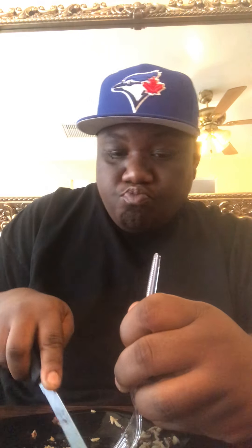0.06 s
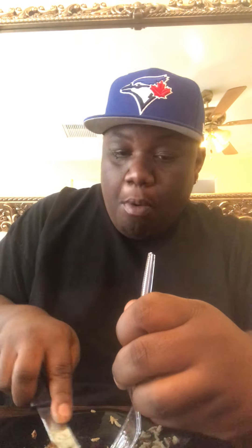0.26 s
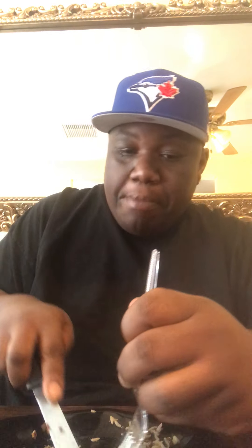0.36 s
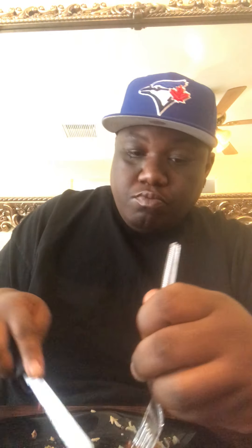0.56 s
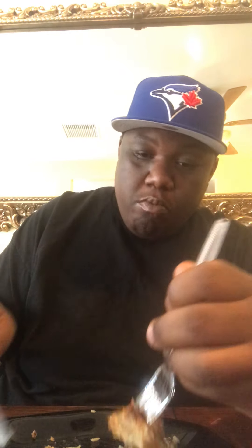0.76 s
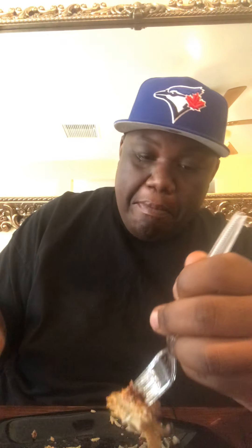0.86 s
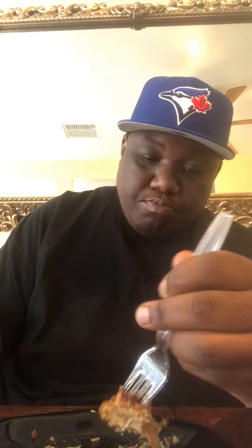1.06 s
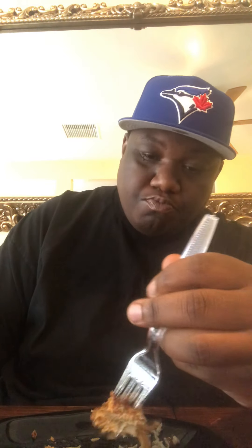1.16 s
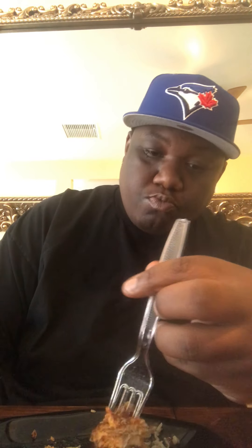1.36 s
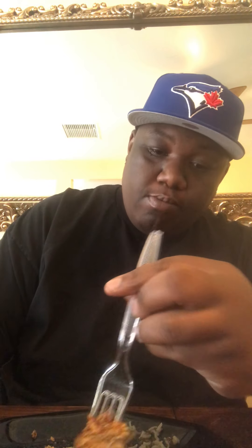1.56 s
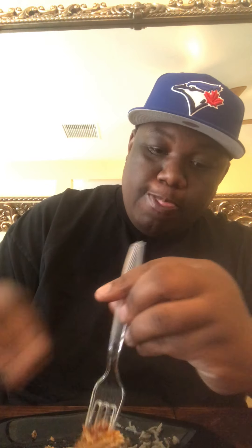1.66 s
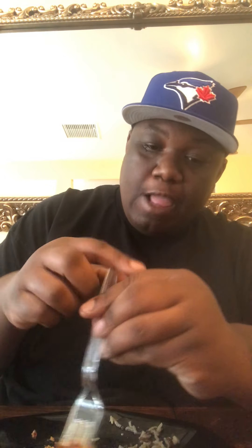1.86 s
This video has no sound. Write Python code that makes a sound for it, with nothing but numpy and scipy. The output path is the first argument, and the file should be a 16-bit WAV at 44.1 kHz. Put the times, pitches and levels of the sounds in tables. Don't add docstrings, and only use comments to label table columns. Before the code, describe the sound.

A table knife saws through food, clacks loudly on a plate, then is set down on wood

```python
import sys
import numpy as np
from scipy import signal
from scipy.fft import rfft, irfft
from scipy.io import wavfile
from scipy.ndimage import uniform_filter1d

SR = 44100
rng = np.random.default_rng(int(sys.argv[2]) if len(sys.argv) > 2 else 0)


def materialize(psi):
    bounded = np.clip(np.atleast_2d(psi).T, -1, 1)
    quanta = np.round(bounded * 32767).astype(np.int16)
    wavfile.write(sys.argv[1], SR, quanta)


def ratio(d):
    e = np.asarray(d, float) / 20
    return 10 ** e


N = 83790
T = np.arange(N) / SR


def unit(x):
    return x / np.sqrt(np.mean(x ** 2))


def band(x, hz, width):
    return signal.lfilter(*signal.iirpeak(min(hz, 0.45 * SR), hz / width, fs=SR), x)


def bell(centre_s, length_s):
    return np.exp(-((T - centre_s) / length_s) ** 2)


def body(x, peaks):
    total = 0
    for k, (hz, width, db) in enumerate(peaks):
        mode = band(band(x, hz, 2 * width), hz, width)
        total = total + (-1) ** k * ratio(db) * np.sqrt(100 / width) * mode
    return unit(total)


def slips():
    slips_per_s, scatter_db = 4000, 2
    chance, sign, size = rng.random((3, N))
    happens = chance < slips_per_s / SR
    return unit(happens * np.sign(sign - 0.5) * ratio(-scatter_db * np.log(size + 0.0059)))


def chatter():
    # t/s, length/s, level/dB
    catches = [
        (.026, .003, 4.5),
        (.056, .003, 3.5),
        (.091, .003, 3),
        (.105, .004, 6.5),
        (.128, .005, 5),
        (.157, .003, 3.5),
        (.209, .003, 5),
        (.2275, .002, 3),
        (.232, .0015, 3.5),
    ]
    rate_per_s, depth_db = 150, 1.5
    hold = int(SR / rate_per_s)
    steps = np.repeat(rng.standard_normal(N // 40), hold)[:N]
    walk = uniform_filter1d(steps, hold)
    grabs = sum(db * bell(s, d) for s, d, db in catches)
    return ratio(depth_db * walk + grabs)


def knife():
    # t/s, rasp level/dB, scrape level/dB
    strokes = np.array([(0, -52, -61), (0.046, -64.5, -61), (0.056, -46.5, -54.5), (0.092, -38.5, -53),
                        (0.157, -43, -59.5), (0.164, -53.5, -69), (0.204, -57, -71.5), (.208, -54.5, -55),
                        (0.216, -54, -51), (0.234, -36, -28), (0.238, -33.5, -32), (.3, -54, -43),
                        (0.419, -82.5, -55.5), (.5, -120, -56), (0.558, -84, -64), (.72, -90, -88)])
    # f/Hz, width/Hz, level/dB
    food = [(475.6, 110, -2), (650, 82, -3.5), (781, 190, -0.5), (1051, 480, -6), (1446, 110, -2.5),
            (1775, 120, -9), (2450, 60, -17.5)]
    # f/Hz, width/Hz, level/dB
    sawing = [(1790, 600, 3.5), (2443, 200, 0), (2780, 320, -4), (3175, 120, 0), (3760, 100, -1),
              (4400, 310, 4), (5170, 500, -6), (6700, 1200, -5), (7680, 690, -7.5), (8900, 960, -9.5),
              (10900, 900, -16), (13800, 1900, -13.5)]
    # f/Hz, width/Hz, level/dB
    dragging = [(1410, 600, 3.5), (1950, 460, -2), (2600, 160, 1), (3000, 300, -12), (3765, 200, -2.5),
                (4445, 250, 1), (5735, 940, 0.5), (7646, 710, -1.5), (8900, 750, -4), (10000, 200, -15.5),
                (11230, 150, -10), (12110, 200, -18), (13370, 180, -11), (14700, 500, -17.5)]
    slip_s = 0.236
    dull = body(slips(), food)
    bright = np.where(T < slip_s, body(slips(), sawing), body(slips(), dragging))
    dull_gain = ratio(np.interp(T, strokes[:, 0], strokes[:, 1]))
    bright_gain = ratio(np.interp(T, strokes[:, 0], strokes[:, 2]))
    return chatter() * (dull * dull_gain + bright * bright_gain)


def hits(rows, modes, spread, rise_s, crack_hz, crack_t60, cycles=0.6):
    side_db = -7.5
    out, t = np.zeros(N + SR), T[:SR // 2]
    f, db, t60 = np.repeat(modes, 3, axis=0).T[:, :, None]
    side = np.tile([0, -1, 1], len(modes))[:, None]
    crack_band = signal.butter(3, [600, crack_hz], "band", fs=SR, output="sos")
    for s, ring_db, contact_ms, crack_db in rows:
        level, detune, turn = rng.standard_normal((3,) + f.shape)
        hz = f * (1 + spread * side * (1 + 0.43 * detune))
        phase = np.repeat(turn[::3], 3, axis=0)
        decay = ratio(db + side_db * side ** 2 + 2.3 * level - 60 * t / t60)
        build = 1 - np.exp(-f * t / cycles)
        ring = (decay * np.sin(2 * np.pi * (hz * t + phase)) * build).sum(0)
        u = (T[:300] + 1 / SR) * 4000 / max(contact_ms, 0.01)
        push = u * np.exp(-u)
        pushed = signal.fftconvolve(ring, push / push.sum())[:len(t)]
        crack = signal.sosfilt(crack_band, rng.standard_normal(len(t)))
        both = ratio(ring_db) * pushed + crack * ratio(crack_db - 60 * t / crack_t60)
        i = int(s * SR)
        out[i:i + len(t)] += both * (1 - np.exp(-t / rise_s))
    return out[:N]


def clacks():
    # t/s, ring level/dB, contact/ms, crack level/dB
    strikes = [
        (.2068, -48, 0.17, -58),
        (.2095, -49.5, 0.14, -45.5),
        (.2312, -31.5, 0.44, -35),
        (.2338, -14.5, 0.073, -9),
        (.4953, -49, 0.051, -49),
    ]
    # f/Hz, level/dB, t60/s
    blade = [(516.2, -15.5, 0.058), (1185, -15, 0.044), (1401, -9.5, 0.037), (1836, -11, 0.044),
             (1980, -2.5, 0.016), (3100, -10, 0.046), (3724, -9, .03), (4300, 7.5, 0.012),
             (4630, -2, 0.028), (5490, -3, 0.015), (7560, -6.5, .03), (10140, -15.5, .034),
             (11170, -6.5, 0.053), (13320, -7.5, 0.054)]
    return hits(strikes, blade, 0.0017, 0.00067, 13000, 0.018)


def thuds():
    # t/s, ring level/dB, contact/ms, crack level/dB
    blows = [(1.5358, -28, 0.85, -45.5), (1.5398, -36, 1, -64), (1.558, -49.5, 0.77, -64),
             (1.592, -51, 0.64, -70), (1.6551, -29.5, 0.2, -30), (1.677, -41.5, 0.6, -47),
             (1.696, -35.5, 0.64, -52), (1.700, -39, .8, -56), (1.7295, -35, 0.35, -48.5),
             (1.7589, -49, 0.37, -62), (1.7809, -39.5, 0.46, -55)]
    # f/Hz, level/dB, t60/s
    wood = [(114, -9, 0.095), (195, -3, 0.045), (234, -5, 0.073), (400, -19.5, 0.1), (450.8, 4, 0.067),
            (553.8, -4, 0.11), (678, -17, 0.11), (883, -3.5, 0.093), (965, -16, 0.07), (1088.5, -11, 0.11),
            (1211, -15, 0.1), (1480, -6.5, 0.077), (1890, -14, 0.087), (2356, -16, 0.077)]
    return hits(blows, wood, 0.078, 0.00046, 4970, 0.035, 1.02)


def landing():
    # t/s, ring level/dB, contact/ms, crack level/dB
    landings = [
        (1.6552, -43, 0.044, -45.5),
    ]
    # t/s, ring level/dB, contact/ms, crack level/dB
    rebounds = [
        (1.5355, -57, 0.17, -55),
        (1.695, -51, 0.27, -58),
        (1.7295, -50, 0.21, -54),
        (1.7815, -57.5, 0.3, -53),
    ]
    # f/Hz, level/dB, t60/s
    steel = [(2360, -2, 0.06), (2730, -1, 0.072), (3120, -9, 0.11), (3950, -0.5, 0.053),
             (4440, -4.5, 0.041), (5130, -1, 0.043), (5670, -13, 0.087), (7100, -9, .04),
             (8900, -15, 0.071), (9900, -21, 0.057), (11600, -14, .05), (13300, -17, 0.033),
             (14900, -15, .02)]
    bright = hits(landings, steel, 0.013, 0.00053, 16000, 0.0088)
    return bright + hits(rebounds, steel[:7], 0.016, 0.00034, 5000, 0.012)


def clinks():
    # t/s, ring level/dB, contact/ms, crack level/dB
    taps = [
        (1.2860, -49.5, 0.035, -39.5),
        (1.8895, -70, 0.027, -46),
        (1.8985, -62, 0.045, -48),
    ]
    # f/Hz, level/dB, t60/s
    plate = [(549, -9.5, 0.15), (1070, -7, 0.34), (1870, -12, 0.6), (3110, -15.5, 0.16), (4440, 6, 0.032),
             (5510, 2, 0.062), (7280, -10.5, 0.056), (8242, -26, 0.028), (9060, -10.5, 0.037),
             (11500, -27, 0.025), (13400, -17, .02), (15160, -3, 0.027)]
    return hits(taps, plate, 0.0057, 0.00043, 22000, 0.0146)


def fork():
    # t/s, length/s, ring level/dB, dull scuff level/dB
    brushes = [(1.30, 0.0099, -62, -67), (1.329, 0.013, -75, -84), (1.373, 0.003, -65, -75),
               (1.383, 0.0068, -67, -79), (1.388, 0.033, -72, -84), (1.412, 0.003, -74, -70),
               (1.446, 0.0045, -69.5, -66), (1.458, 0.0052, -73, -63.5), (1.476, .003, -68, -75),
               (1.487, 0.013, -70, -67.5), (1.52, 0.0087, -63.5, -67), (1.541, 0.011, -67, -59),
               (1.637, .012, -88, -70), (1.868, 0.0081, -77, -78)]
    # f/Hz, width/Hz, level/dB
    glaze = [(3695, 200, -7), (4400, 300, -1.5), (5450, 250, 4), (6080, 270, -11), (6870, 400, -4),
             (8900, 220, -6.5), (9800, 400, -14), (11700, 500, -9), (13200, 1200, -11), (15400, 500, -9)]
    # f/Hz, width/Hz, level/dB
    scuff = [(1100, 700, 5), (2670, 970, -4), (4160, 800, 1)]
    # t/s, length/s, level/dB, f/Hz
    creaks = [
        (0.652, 0.011, -65, 2500),
        (0.683, 0.012, -71, 2397),
        (0.72, 0.043, -74.5, 2370),
        (0.776, 0.0055, -80, 2450),
        (0.808, 0.037, -68.5, 2450),
        (0.846, 0.03, -69, 2520),
        (1.12, 0.037, -73.5, 2048),
        (1.496, 0.0033, -55.5, 1640),
        (1.25, 0.012, -78.5, 2520),
    ]
    x = slips()
    ring, dull = body(slips(), glaze), body(slips(), scuff)
    brush = sum((ratio(db) * ring + ratio(dull_db) * dull) * bell(s, d) for s, d, db, dull_db in brushes)
    squeak = sum(ratio(db) * bell(s, d) * unit(band(band(x, f, 410), f, 310)) for s, d, db, f in creaks)
    return brush + squeak


def crumbs():
    # t/s, level/dB, f/Hz
    ticks = [(.428, -58, 13900), (0.446, -71, 13020), (.476, -58.5, 14300), (.490, -62, 14000),
             (.53, -50, 4460), (.53, -71, 14000), (.05, -56, 5000), (.44, -64, 14000), (.465, -63.5, 13800),
             (.506, -70, 10900), (1.63, -67, 3500), (1.76, -55, 2630), (0.557, -67.5, 13980),
             (.58, -75, 8000), (0.7046, -59, 3020), (1.8671, -67, 6500), (1.8671, -69, 4300),
             (0.496, -58, 8900), (1.418, -66, 2500)]
    x = rng.standard_normal(N)
    total = 0
    for s, db, f in ticks:
        decay = ratio(db + 16.5 - 60 * np.abs(T - s) / 0.0071)
        burst = x * (T >= s) * decay
        total = total + band(band(burst, f, 0.3 * f), f, 0.17 * f)
    return total


def bumps():
    # t/s, length/s, level/dB, f/Hz
    shudders = [(0, 0.0095, -49, 219.5), (0.115, 0.028, -51.5, 220), (0.219, 0.017, -45.5, 115.6),
                (0.245, 0.039, -46, 210), (0.399, .018, -48.5, 195), (1.704, 0.012, -46, 195.4),
                (0.426, 0.043, -51, 115), (0.461, 0.017, -62, 191), (1.331, 0.027, -58.5, 196),
                (1.406, 0.017, -63, 400), (1.612, 0.061, -54.5, 112.4)]
    x = rng.standard_normal(N)
    return sum(ratio(db) * bell(s, d) * unit(band(band(x, f, 1.1 * f), f, 0.35 * f)) for s, d, db, f in shudders)


def room(x):
    # f/Hz, t60/s, level/dB
    decays = [(220, 0.51, -21), (566, .5, -23), (1000, 0.38, -22.5), (1730, .55, -26), (2900, 0.48, -30),
              (4960, .6, -35), (7800, 0.41, -30), (11620, 0.66, -23)]
    delay_s, relative_width = 0.0031, 0.8
    t = T[:SR]
    h = 0
    for f, t60, db in decays:
        noise = unit(band(rng.standard_normal(SR), f, relative_width * f))
        h = h + noise * ratio(db - 60 * t / t60) / np.sqrt(SR * t60 / 14)
    onset = 1 - np.exp(-(t / delay_s) ** 2)
    return signal.fftconvolve(x, h * onset)[:N]


def air():
    # f/Hz, density level/dB
    spectrum = np.array([(15, -49.5), (25, -12), (92, -8.5), (127, -6.5), (185, -9.5), (363, -12.5),
                         (531, -19.5), (2000, -27.5), (16000, -44.5)])
    tone_db, hum_db, hum_hz, hum_width_hz = -63, -66, 123, 9
    f = np.arange(N // 2 + 1) * SR / N + 1
    gain = ratio(np.interp(np.log(f), np.log(spectrum[:, 0]), spectrum[:, 1]))
    tone = irfft(rfft(rng.standard_normal(N)) * gain, N)
    hum = band(rng.standard_normal(N), hum_hz, hum_width_hz)
    return ratio(tone_db) * unit(tone) + ratio(hum_db) * unit(hum)


def scene():
    table_sounds = knife() + clacks() + thuds() + landing() + clinks() + fork() + crumbs() + bumps()
    near = signal.sosfilt(signal.butter(2, 90, "high", fs=SR, output="sos"), table_sounds)
    return (near + room(near) + air())[None]


def top_cut(x):
    return signal.sosfilt(signal.butter(12, 16780, fs=SR, output="sos"), x)


def record(dry):
    mix = signal.sosfilt(signal.ellip(10, 0.3, 40, 15750, fs=SR, output="sos"), dry)
    return top_cut(mix)


dry = scene()
out = record(dry)
materialize(out)
```